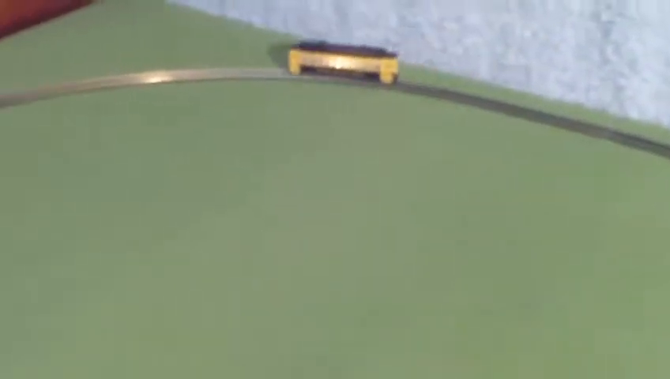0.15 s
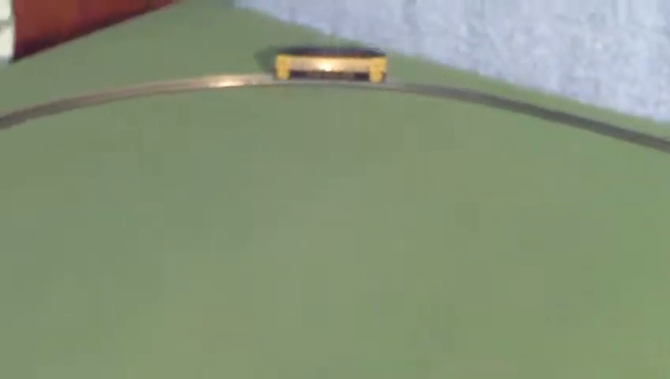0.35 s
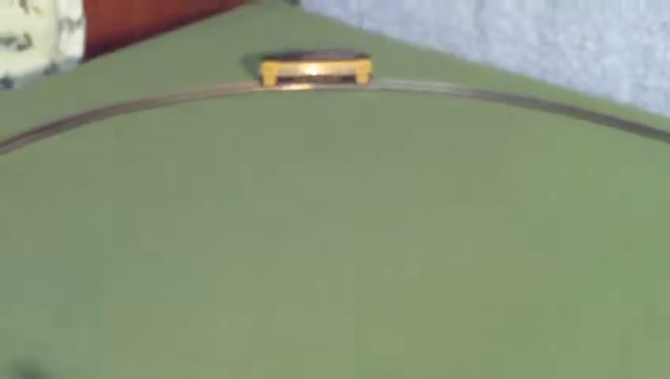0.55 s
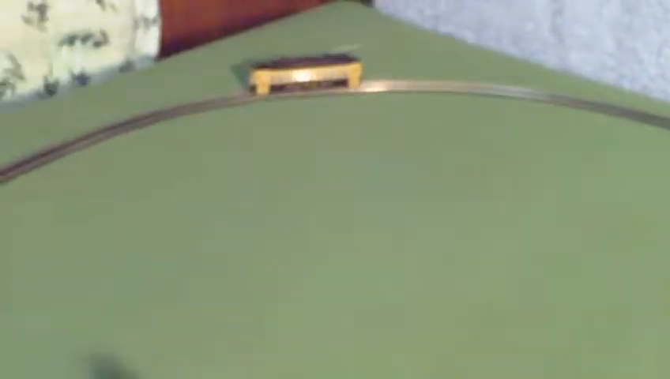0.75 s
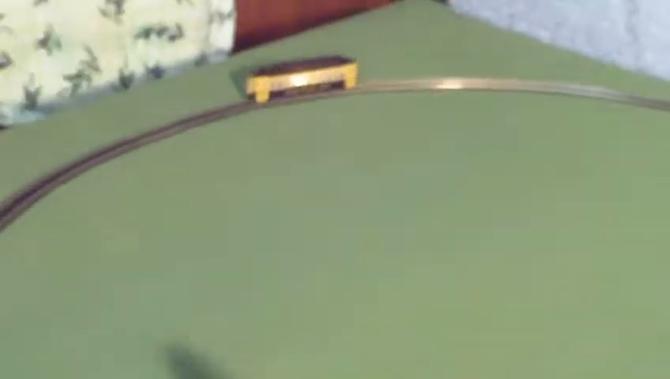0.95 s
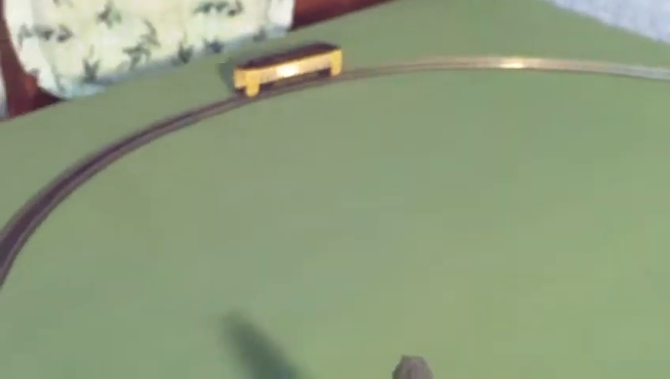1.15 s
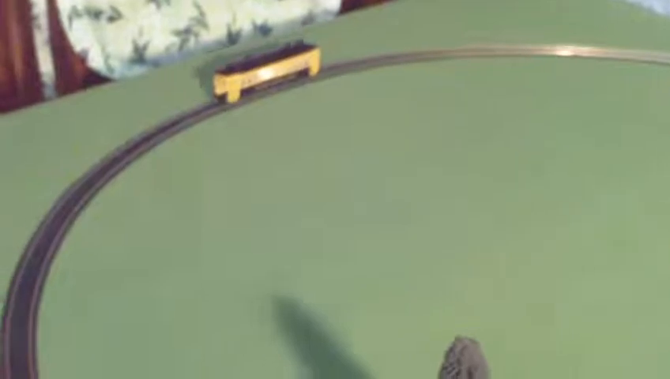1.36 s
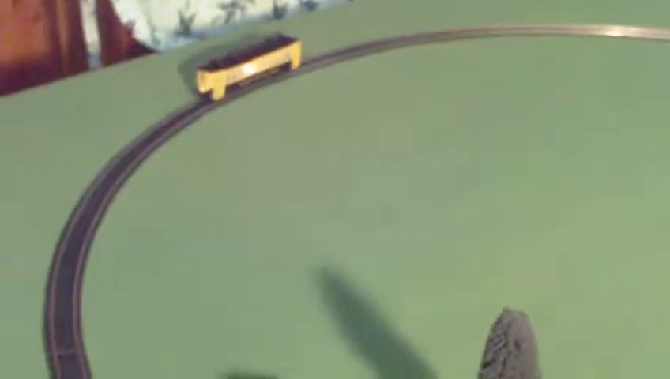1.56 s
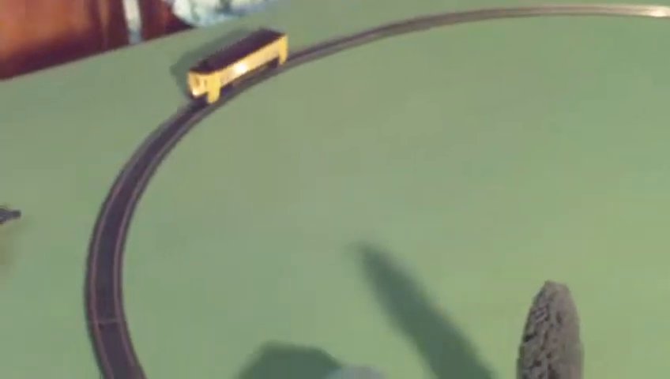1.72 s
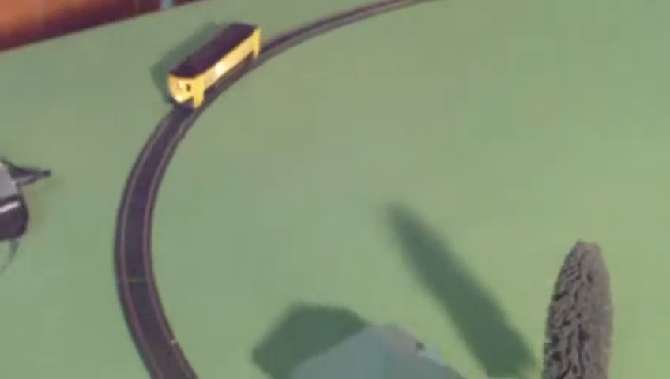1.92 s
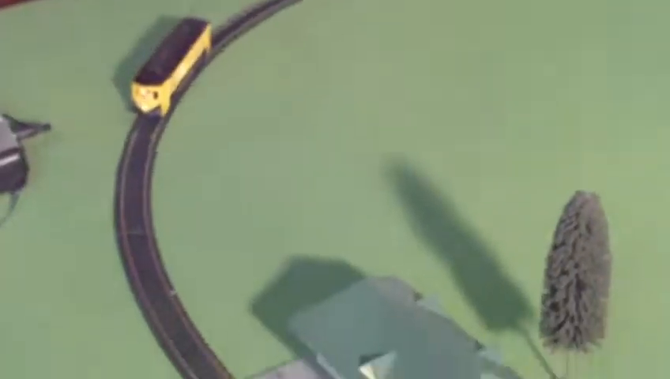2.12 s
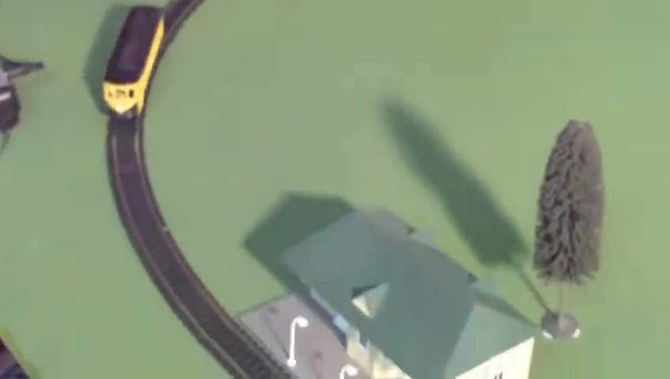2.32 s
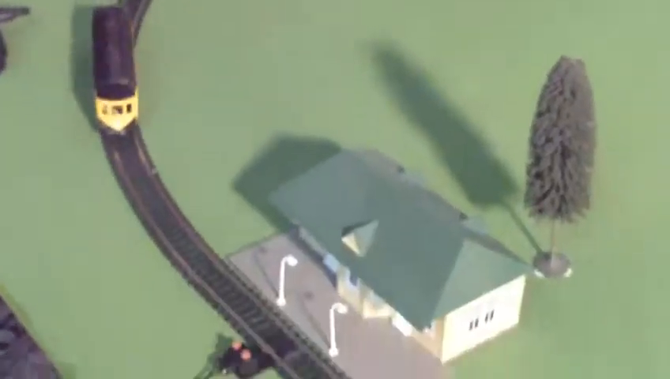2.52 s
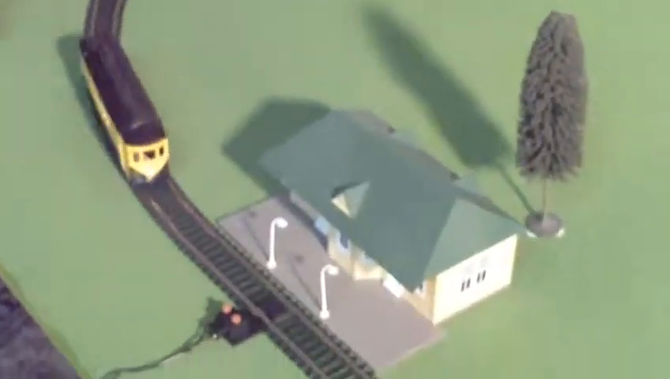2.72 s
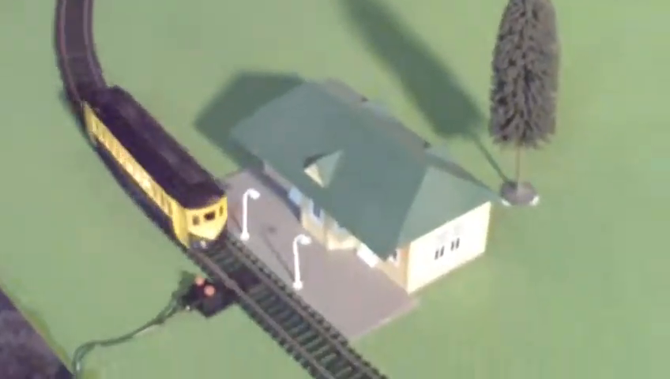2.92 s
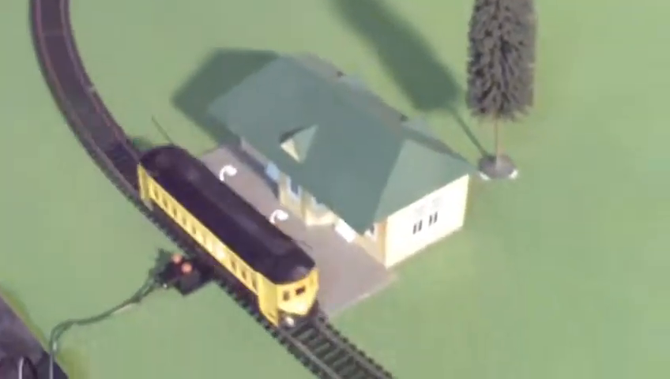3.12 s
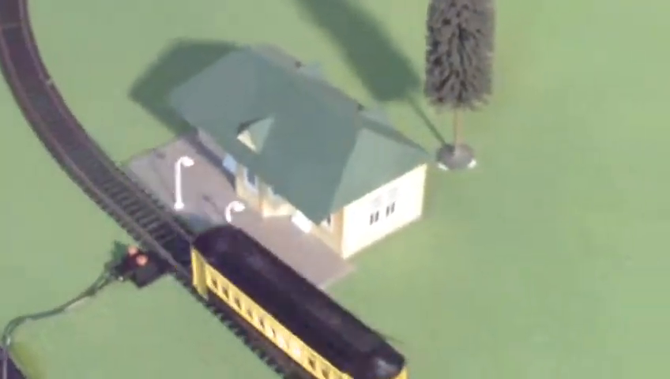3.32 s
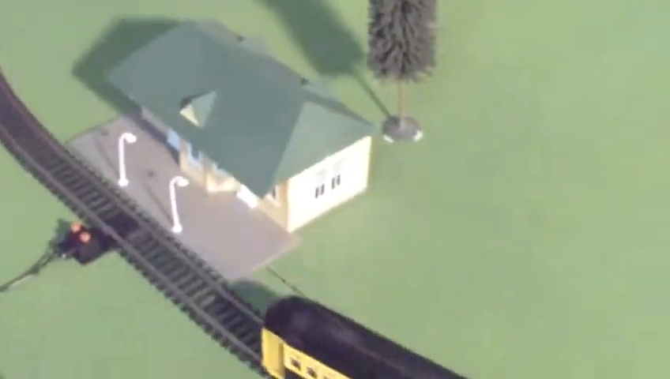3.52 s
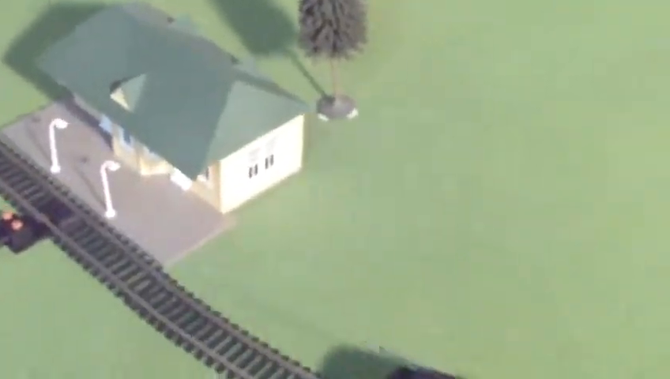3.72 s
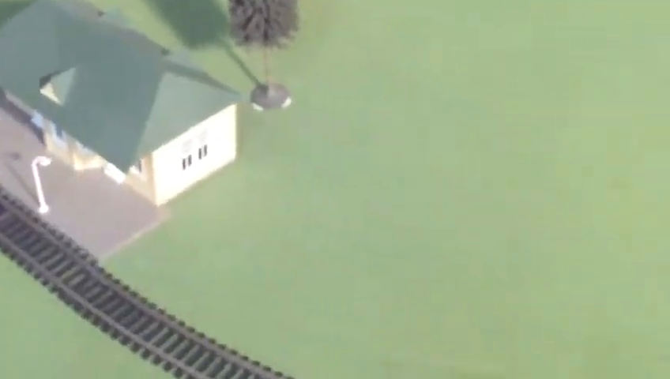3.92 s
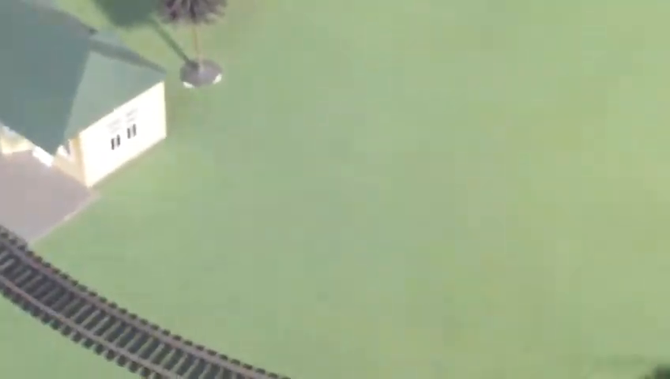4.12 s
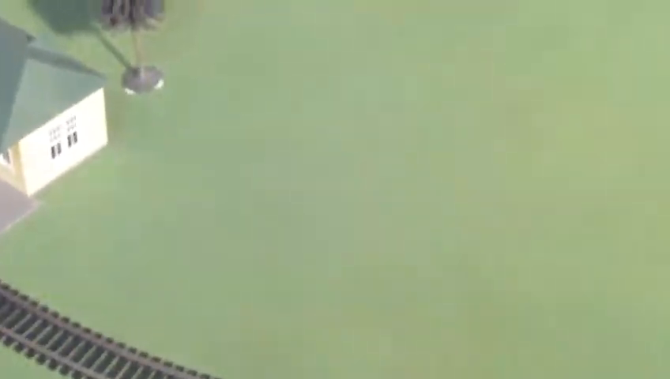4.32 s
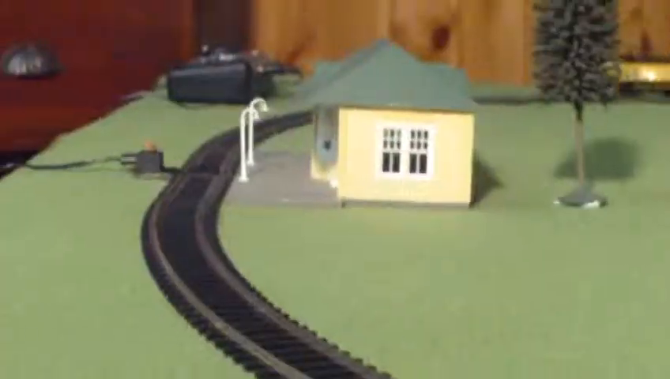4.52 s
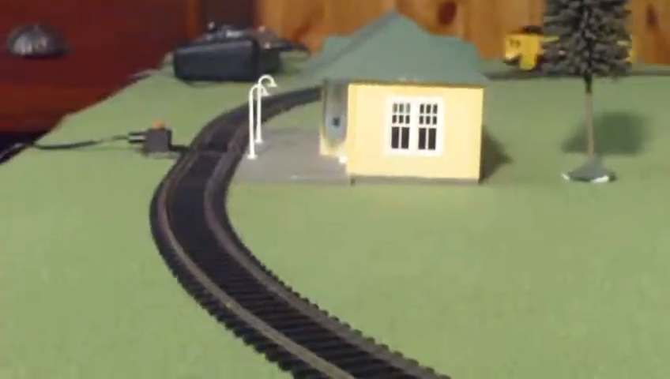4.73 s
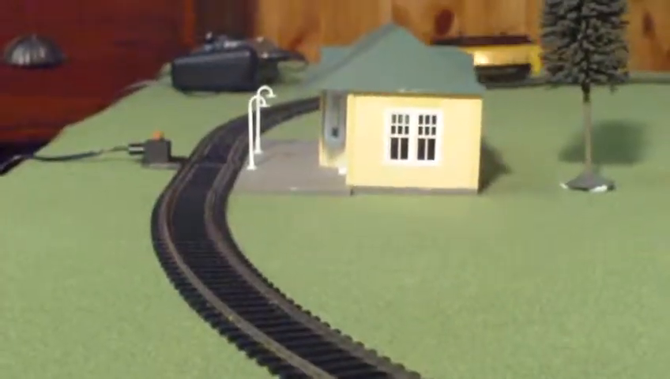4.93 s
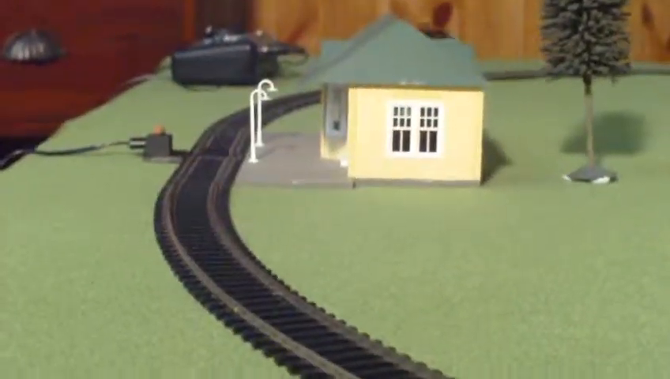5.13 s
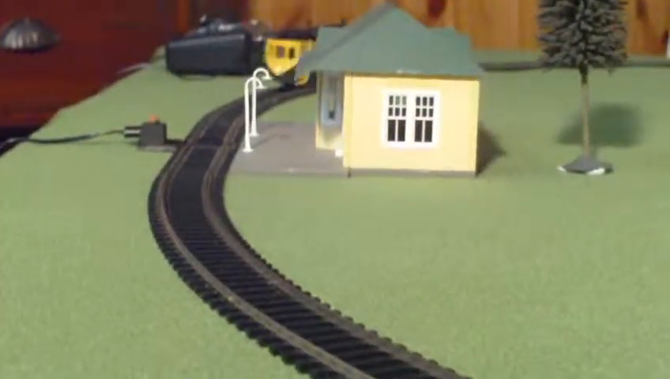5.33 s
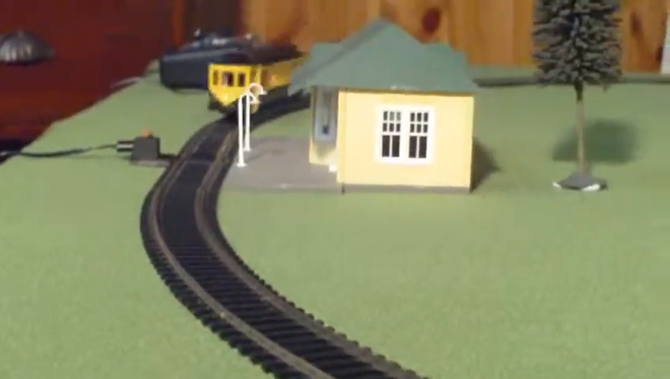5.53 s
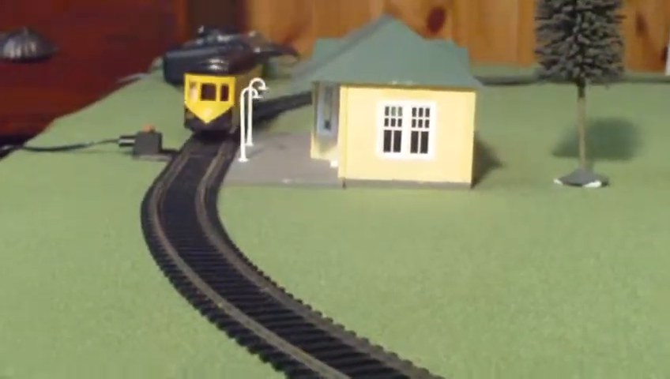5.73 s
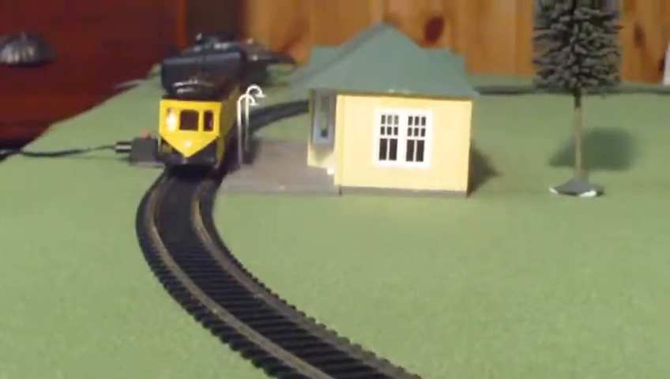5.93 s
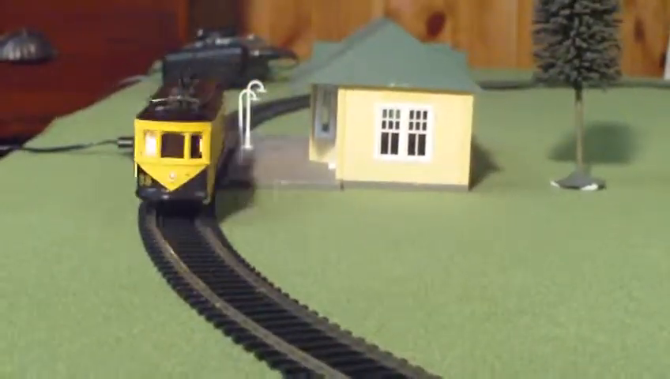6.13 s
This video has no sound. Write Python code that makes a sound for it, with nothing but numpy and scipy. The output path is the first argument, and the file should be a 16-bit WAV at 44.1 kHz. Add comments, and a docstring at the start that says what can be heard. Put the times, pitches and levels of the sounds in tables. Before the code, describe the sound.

Heard from close stereo microphones in a furnished room, a miniature electric tram circles with a high, hissy gear rattle that keeps surging. Beneath it the wheels rumble softly on the baseboard and a faint motor hum comes and goes. After a split-second break the sound resumes at track level with more rumble, a single rail joint clack and light metallic ticks, becoming louder and brighter as the tram approaches and dipping briefly near the end.

```python
"""Indoors, a small electric model tram circles on a baseboard, 1.4 to 0.45 m from a stereo microphone pair.
Heard first from above, its loose gears chatter in surges over a faint motor hum, while the wheels
make the board rumble and a flange ticks now and then. At 4.5 s the sound breaks off and returns
from track level: the tram passes behind the station, clacks once over a rail joint and comes
head-on, close and bright, with one brief dip in level."""
import sys
import numpy as np
from scipy import signal
from scipy.fft import rfft, irfft
from scipy.io import wavfile
from scipy.ndimage import uniform_filter1d

SR = 44100
rng = np.random.default_rng(int(sys.argv[2]) if len(sys.argv) > 2 else 0)


def wrap_up_sound(samples):
    """Save the sound to the file named by the first command line argument, as 16-bit audio."""
    columns = np.atleast_2d(samples).T
    # keep every value between -1 and 1, then stretch to whole-number steps
    tamed = np.clip(columns, -1, 1)
    steps = np.round(tamed * 32767).astype(np.int16)
    wavfile.write(sys.argv[1], SR, steps)


N = 271656
TIME = np.arange(N) / SR
HZ = np.fft.rfftfreq(N, 1 / SR)
TRACK_LEVEL_S = 4.492  # from here on the microphones are level with the track

# the gears rattle harder for a moment: (time [s], rise [dB], length [s], band it stands out in [Hz])
SURGES = [(0.123, 2.5, 0.089, 8200), (0.396, 1.5, 0.028, 4960), (0.659, 7, .01, 4300),
          (0.694, 5, .022, 4700), (0.745, 5.5, 0.026, 3930), (0.808, 4, .015, 3800),
          (0.967, 3.5, 0.068, 8900), (1.273, 3, 0.028, 4830), (1.328, 5, .016, 8800), (1.39, 2, .04, 4800),
          (1.68, 2.5, 0.044, 4970), (2.054, 3.5, 0.072, 4110), (2.14, 4, .021, 4630),
          (2.332, 3.5, 0.023, 9000), (2.59, 4, 0.056, 7200), (2.837, 4, 0.037, 9500),
          (2.923, 2, 0.014, 4300), (3.018, 4, 0.036, 4270), (3.133, 4.5, 0.026, 6700),
          (3.485, 4, 0.082, 8500), (3.62, 3, 0.09, 8000), (3.914, 3, 0.013, 8700), (3.946, 6.5, .016, 5570),
          (4.04, 2.5, .018, 8100), (4.17, 2, .05, 8250), (4.22, 4.5, .011, 8900), (4.289, 4, 0.032, 5200),
          (4.644, 4, .022, 3650), (4.953, 3.5, 0.042, 5200), (5.222, 5, .012, 5330),
          (5.38, 2.5, 0.013, 5700), (5.476, 3, .04, 6900), (5.655, 4.5, .02, 7000), (5.701, 5, .011, 7000),
          (5.76, 3.5, 0.048, 7050), (5.866, 5, .014, 7100), (5.977, 2, .07, 6900), (6.088, 3, 0.022, 6900)]
# resonances of the hollow body: (frequency [Hz], width [Hz], side-on level [dB], head-on level [dB])
SHELL = [(4260, 430, 1.5, 5), (4990, 480, 2.5, -0.5), (5650, 370, 1.9, 6), (6750, 520, 0.5, 9),
         (7590, 650, 2.5, 5), (8860, 820, 2, 9.5), (9800, 4000, 0, 5), (13300, 1100, 2, 1)]


def gears(turns, level_db=-25, room_radius_m=1.55, flutter_db=1.42, pulse_db=0.94, slide=0.8):
    """Teeth knock through their backlash, in clumps and a little harder at each pole; sliding adds hiss."""
    # chatter spectrum from above and from track level: (frequency [Hz], level [dB])
    chatter_above = [(600, -53), (1250, -19.5), (1900, -12.5), (2450, -13), (3000, -5.5), (3800, -1),
                     (6200, -3.5), (8300, -0.26), (9600, -6), (11500, -5), (12400, -12), (15300, -18.5)]
    chatter_low = [(600, -55), (1250, -22), (1900, -15.5), (2700, -12), (3400, -2.5), (4700, -2.5),
                   (6200, -4.5), (7300, -1), (9500, -7), (11500, -8), (12400, -13), (13400, -19.5),
                   (14200, -34), (15300, -33)]
    # the gears mesh quietly for a moment: (time [s], level change [dB], length [s])
    lulls = [(0.045, -3, .06), (0.62, -2.5, 0.1), (1.485, -3.5, .07), (5.89, -1.5, 0.044)]
    teeth = evened(scattered(impacts(per_s=5500, spread_db=3.5)) + slide * rng.standard_normal(N))
    # beyond its radius the room carries more than the direct path
    running_db = level_db + 10 * np.log10(1 / distance() ** 2 + 1 / room_radius_m ** 2)
    surge_db = swells(SURGES) + swells(lulls) + small_surges()
    clump_db = flutter_db * (1 + 0.57 * facing()) * wander(97)  # clumps stand out more head-on
    force = gain_of(running_db + surge_db + clump_db + pulse_db * np.cos(2 * np.pi * turns))
    return radiate(from_both_places(teeth * force, chatter_above, chatter_low, band_hz=(3000, 9000)))


def small_surges(per_s=11, typical_db=2.5, length_s=0.017, give_way_db=3):
    """Lesser rattles come by chance and give way to the great surges; a level change in dB."""
    draws = rng.random((int(N / SR * per_s) + 1, 2))
    humps = [typical_db * (.5 + size) * bell(TIME, (k + late) / per_s, length_s)
             for k, (late, size) in enumerate(draws)]
    rise_db = np.max(humps, axis=0)
    return (rise_db - rise_db.mean()) * np.exp(-swells(SURGES) / give_way_db)


def scattered(x, t60=0.0028):
    """Each knock bounces about inside the small body for a moment."""
    t = np.arange(400) / SR
    echo = rfft(rng.standard_normal(len(t)) * gain_of(-60 * t / t60), 1024)
    return signal.oaconvolve(x, irfft(echo / abs(echo)))[:N]


def radiate(x, patchy_db=1.64, treble_db=-2.5, per_halving_db=3):
    """The turning body beams single bands and brightens as it nears; each surge has its own colour."""
    # bands the shell throws at the microphones: (time [s], length [s], frequency [Hz], boost [dB])
    beams = [(1.0, 1, 4600, 1), (1.65, .4, 6300, 1.5), (2.55, 0.46, 10240, 7), (3.2, 0.51, 6100, 4),
             (3.55, 0.39, 6800, 3.5), (4.15, 0.64, 5700, 1), (4.95, 0.97, 5500, 4), (5.95, 0.89, 5260, 6.5)]
    hz, t, spectra = signal.stft(x, SR, nperseg=512, noverlap=384)
    hz = hz[:, None]
    at, length, beam_hz, beam_db = np.transpose(beams)
    field_db = (beam_db * bell(hz, beam_hz, width=1500)) @ bell(t[:, None], at, length).T
    treble = np.clip((hz - 7500) / 5000, 0, 1.3)
    near_db = -per_halving_db * np.log2(distance(t)) * (1 - facing(t))
    station_db = -4 * bell(t, 4.85, width=0.58)  # the station screens the treble
    field_db += treble * (treble_db + near_db + station_db)
    for mode_hz, width, side_db, front_db in SHELL:
        field_db += (side_db + facing(t) * (front_db - side_db)) * bell(hz, mode_hz, width)
    at, rise_db, length, surge_hz = np.transpose(SURGES)
    surging = bell(t[:, None], at, length)
    field_db += (rise_db * bell(hz, surge_hz, width=600)) @ surging.T
    field_db -= 0.52 / (1 + (hz / 2000) ** 8) * (surging @ rise_db)  # surges are mostly treble
    # reflections off the board shift as the tram moves, so narrow bands swell and fade
    patches = uniform_filter1d(rng.standard_normal(spectra.shape), size=3, axis=0)
    patches = uniform_filter1d(patches, size=60, axis=1)
    gain = gain_of(field_db + patchy_db * evened(patches))
    # turning moves the energy between bands without adding any
    main_band = (hz[:, 0] > 3000) & (hz[:, 0] < 9000)
    gain /= np.sqrt(np.mean(gain[main_band] ** 2, axis=0))
    return signal.istft(spectra * gain, SR, nperseg=512, noverlap=384)[1][:N]


def ticks(t60=0.0064):
    """Each tick of a wheel flange on the rail rings the shell for a few milliseconds."""
    # flange strikes: (time [s], level [dB])
    strikes = [(3.977, -7), (4.305, -5), (4.456, -14), (5.512, -3), (5.8, -2), (6.099, 1)]
    t = np.arange(600) / SR
    decay = (1 - np.exp(-t / 0.0001)) * gain_of(-60 * t / t60)
    modes = sum(gain_of(db) * np.sin(2 * np.pi * (hz * t + rng.random())) for hz, _, _, db in SHELL[:6])
    ring = decay * modes
    blows = np.zeros(N)
    for at, db in strikes:
        blows[round(at * SR)] = gain_of(db)
    return signal.oaconvolve(blows, ring / abs(ring).max())[:N]


def clack(at_s=5.0574, level_db=-8):
    """A blow at a rail joint: each mode needs most of a cycle to answer, so the high ones come first."""
    # modes of the struck track: (frequency [Hz], level [dB], t60 [s])
    modes = [(685, 1, 0.014), (1054, -3, 0.018), (1570, -3.5, 0.019), (1960, -1, 0.016), (3220, -1, 0.01),
             (6500, -6, .004)]
    sound = np.zeros(N)
    for hz, db, t60 in modes:
        t = np.maximum(TIME - at_s - .8 / hz, 0)
        sound += gain_of(level_db + db - 60 * t / t60) * np.sin(2 * np.pi * hz * t)
    return sound


def knocks():
    """Ticks and clack come from parts too small to push out any bass."""
    return signal.sosfilt(signal.butter(8, 520, "highpass", fs=SR, output="sos"), ticks() + clack())


def wheels(above_db=-44, low_db=-35.5, per_halving_db=1.3, flutter_db=0.46):
    """Wheels bump over the grain of the rails and drive the baseboard, which has one ringing note."""
    # baseboard spectrum from above and from track level: (frequency [Hz], level [dB])
    board_above = [(30, -28), (100, -47), (180, -30), (255, -14), (320, -10), (420, -10.5), (485, -0.5),
                   (540, -3), (720, 1.5), (1080, 0), (1350, -5.5), (1900, -0.5), (2600, -3.5), (4000, -19)]
    board_low = [(30, -28), (100, -42), (180, -32), (250, -15), (340, -19.5), (470, -7.5), (690, -1.5),
                 (820, 2), (960, -1.5), (1100, -2.5), (1400, -9), (2000, -7.5), (2400, -5.5), (4000, -16)]
    above = TIME < TRACK_LEVEL_S
    # at track level the rumble eases and the note dies away as the tram leaves the far side
    since = np.maximum(TIME - TRACK_LEVEL_S, 0)
    rumble_db = np.where(above, above_db, low_db - 2 * since) - per_halving_db * np.log2(distance())
    note_share = np.where(above, 0.033, 0.83 * np.exp(-since / .6))
    bumps = impacts(per_s=3500, spread_db=1.5) * gain_of(flutter_db * wander(17))
    board = from_both_places(bumps, board_above, board_low, band_hz=(450, 1200))
    note = ringing(board, hz=857, width_hz=30)
    return ((1 - note_share / 2) * board + note_share * note / 2) * gain_of(rumble_db)


def motor_turns(start_hz=266.8, sag_hz_per_s=2.2, waver=0.0099):
    """Count of pole passings; the speed sags and wavers with the load."""
    return np.cumsum((start_hz - sag_hz_per_s * TIME) * (1 + waver * wander(10.4))) / SR


def motor(turns, floor_db=-69.5, waver_db=1.7):
    """The pull of the poles hums through the chassis."""
    # the hum swells: (time [s], rise [dB], length [s])
    hum_swells = [(0.03, 20, 0.43), (0.45, 15.5, .2), (2.85, 13, 0.68), (3.65, 5.5, .35)]
    level_db = floor_db + swells(hum_swells) + waver_db * wander(10)
    return np.sqrt(2) * np.sin(2 * np.pi * turns) * gain_of(level_db)


def room(x, t60=0.099, echoes_per_s=2000):
    """A small furnished room returns two different sets of sparse reflections."""
    t = np.arange(SR // 3) / SR
    taps = rng.standard_normal((2, len(t))) * (rng.random((2, len(t))) < echoes_per_s / SR)
    taps *= (t > .002) * gain_of(-60 * t / t60)
    taps /= np.linalg.norm(taps, axis=1, keepdims=True)
    return signal.fftconvolve(x[None], taps, axes=1)[:, :N]


def distance(t=TIME):
    """Metres from the tram to the microphones."""
    # the way round the loop: (time [s], distance [m])
    path = [(0, 1.38), (1.3, 1.22), (1.7, 0.85), (2.3, 1.06), (3.4, 0.59), (4.2, 0.72), (4.7, 1),
            (5.55, .72), (5.8, 0.45), (6.16, 0.5)]
    return np.interp(t, *np.transpose(path))


def facing(t=TIME, bend_s=5.2, bend_length_s=0.54):
    """The last bend swings the tram from side-on (0) to head-on (1)."""
    return np.clip((t - bend_s) / bend_length_s, 0, 1)


def from_both_places(x, above, low, band_hz):
    """One colour with the microphones above the board, another at track level."""
    return np.where(TIME < TRACK_LEVEL_S, coloured(x, above, band_hz), coloured(x, low, band_hz))


def coloured(x, spectrum, band_hz):
    """Colours a white drive of rms 1 so that the given band has rms 1."""
    gain = gain_of(spectrum_db(spectrum))
    inside = (HZ > band_hz[0]) & (HZ < band_hz[1])
    return irfft(rfft(x) * gain / np.sqrt(np.mean(gain ** 2 * inside)), N)


def spectrum_db(points):
    """Joins (frequency [Hz], level [dB]) points on a log frequency scale."""
    hz, db = np.transpose(points)
    return np.interp(np.log(HZ + 1), np.log(hz + 1), db)


def impacts(per_s, spread_db):
    """Tiny blows of random time, sign and size."""
    struck = rng.random(N) < per_s / SR
    size = np.clip(rng.standard_normal(N), -2, 2)
    return evened(struck * rng.choice([-1, 1], N) * gain_of(spread_db * size))


def ringing(x, hz, width_hz):
    """One resonance, scaled to rms 1."""
    r = np.exp(-np.pi * width_hz / SR)
    return evened(signal.lfilter([1, 0, -1], [1, -2 * r * np.cos(2 * np.pi * hz / SR), r * r], x))


def wander(rate_hz):
    """Random drift of rms 1, up to about rate_hz."""
    return evened(irfft(rfft(rng.standard_normal(N)) / np.sqrt(1 + (HZ / rate_hz) ** 4), N))


def swells(rows):
    """Smooth humps in dB, from rows that begin (time [s], rise [dB], length [s])."""
    return sum(db * bell(TIME, at, length) for at, db, length, *_ in rows)


def bell(x, centre, width):
    """A smooth hump of height 1, width taken at half height."""
    return .5 ** ((2 * (x - centre) / width) ** 2)


def gain_of(db):
    """Decibels to amplitude."""
    return 10 ** (np.asarray(db) / 20)


def evened(x):
    """Scales to rms 1."""
    return x / np.sqrt(np.mean(x ** 2) + 1e-20)


def breaks(cut_s=0.005, silence_db=-50):
    """Each break cuts the sound quickly, holds, and lets it climb back."""
    # a gap, then a brief dip: (time [s], hold [s], level on return [dB], recovery [s])
    gaps = [(4.481, 0.017, -20, 0.099), (5.802, 0.002, -6, 0.059)]
    level_db = np.zeros(N)
    for at, hold, return_db, recovery in gaps:
        cut = np.clip((TIME - at) / cut_s, 0, 1)
        climb = np.clip((TIME - at - hold) / recovery, 0, 1)
        level_db += cut * np.where(TIME < at + hold, silence_db, return_db * (1 - climb))
    return gain_of(level_db)


def scene(room_db=-11, width_db=-23):
    """The tram and its room; the two channels differ only by a faint spread of room sound."""
    turns = motor_turns()
    tram = gears(turns) + wheels() + knocks()
    shared, apart = room(tram)
    middle = tram + motor(turns) + gain_of(room_db) * shared
    side = gain_of(width_db) * apart
    return np.array([middle + side, middle - side])


def record(dry, notch_hz=7890, notch_width_hz=170, low_cut_hz=130, high_cut_hz=15330):
    """A lean to the left, a narrow notch, the breaks, overload on the tallest ticks, and band limits."""
    # the sound leans left, less so near 2.3 kHz and in the top treble:
    # (frequency [Hz], left minus right [dB])
    lean = [(100, 3.5), (600, 3.7), (1300, 3.3), (2300, 1), (4400, 3), (8000, 3), (14000, .3)]
    balance = gain_of(np.array([[.5], [-.5]]) * spectrum_db(lean))
    detuning = (HZ - notch_hz) / (notch_width_hz / 2)
    notch = 1j * detuning / (1 + 1j * detuning)
    sound = irfft(rfft(dry) * balance * notch, N)
    sound = np.clip(sound * breaks(), -.92, .92)
    sound = signal.sosfilt(signal.butter(2, low_cut_hz, "highpass", fs=SR, output="sos"), sound)
    high_cut = signal.firwin(801, high_cut_hz, window=("kaiser", 9), fs=SR)
    return signal.oaconvolve(sound, high_cut[None], "same")


dry = scene()
out = record(dry)
wrap_up_sound(out)
```